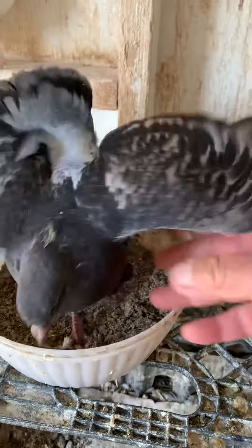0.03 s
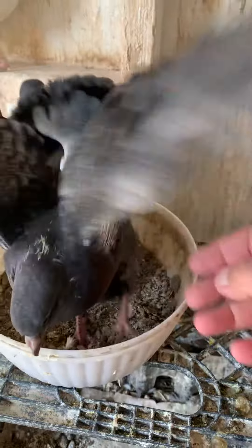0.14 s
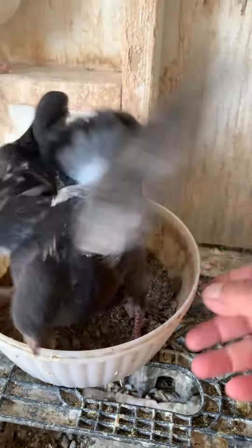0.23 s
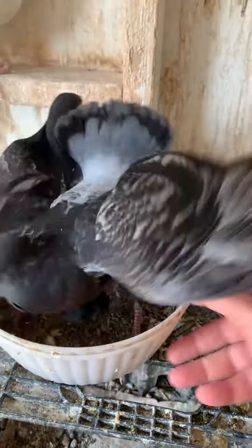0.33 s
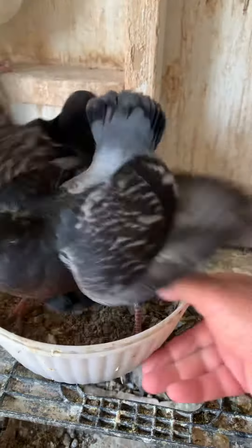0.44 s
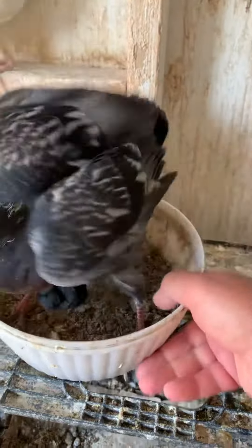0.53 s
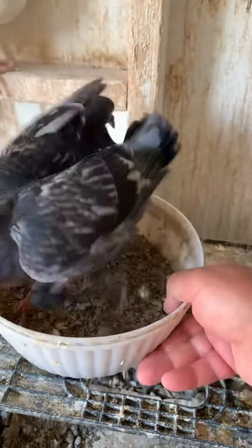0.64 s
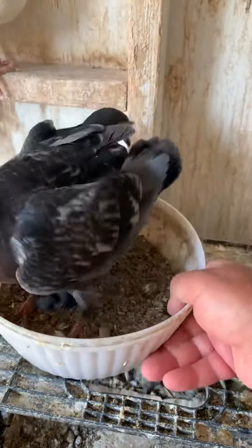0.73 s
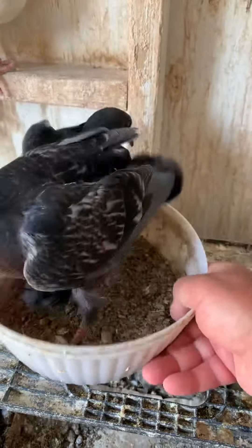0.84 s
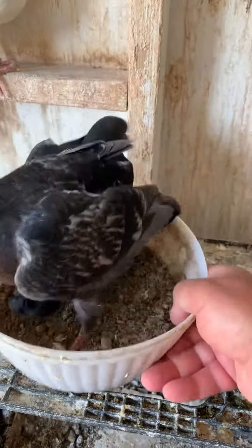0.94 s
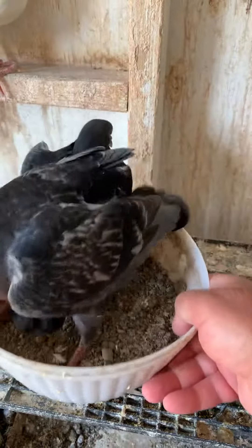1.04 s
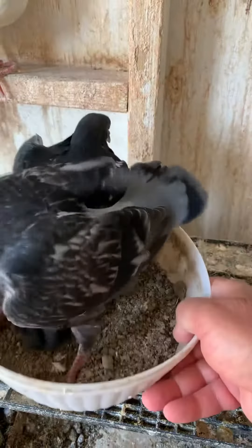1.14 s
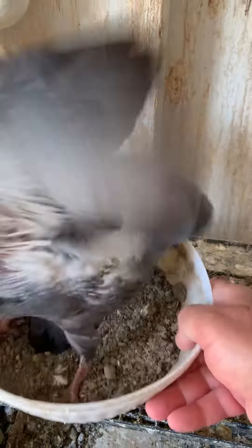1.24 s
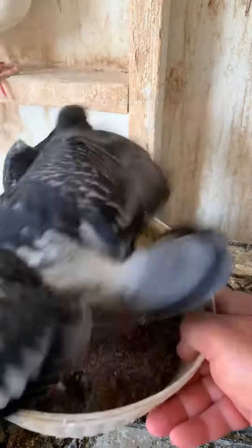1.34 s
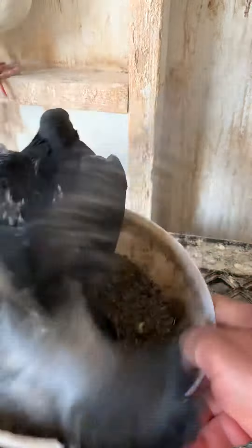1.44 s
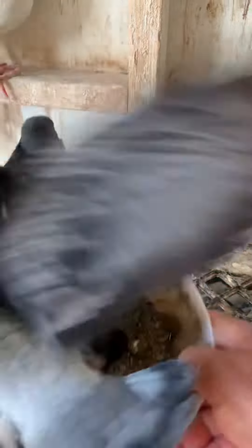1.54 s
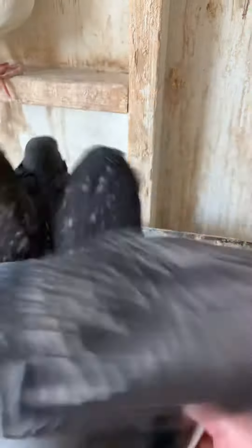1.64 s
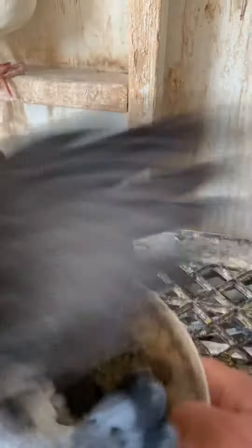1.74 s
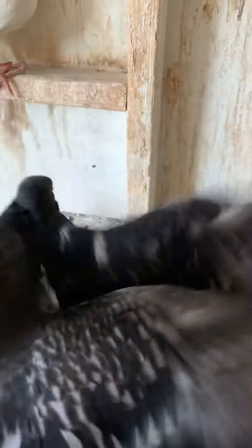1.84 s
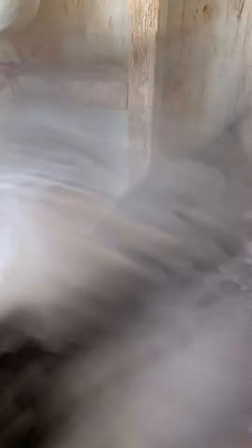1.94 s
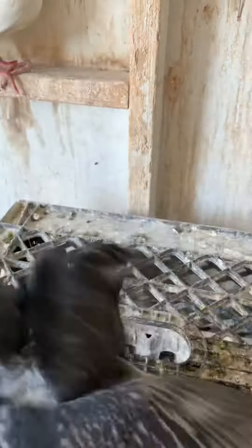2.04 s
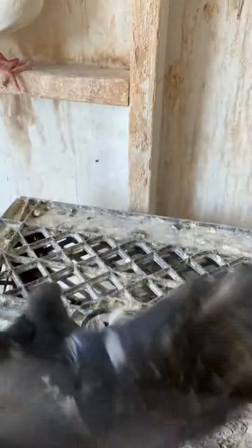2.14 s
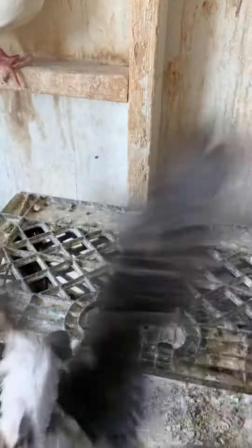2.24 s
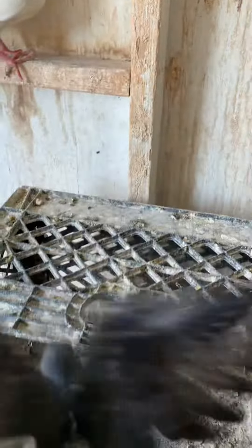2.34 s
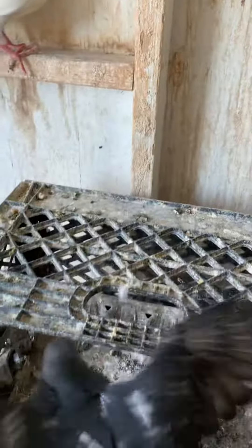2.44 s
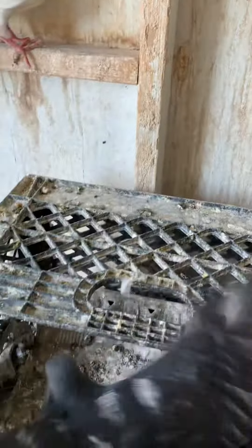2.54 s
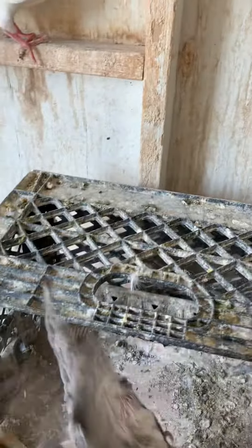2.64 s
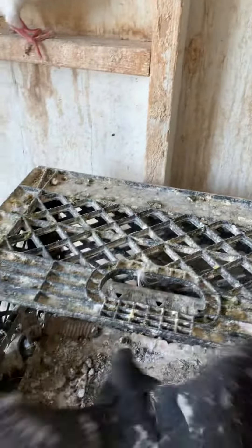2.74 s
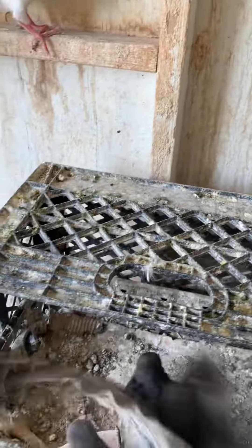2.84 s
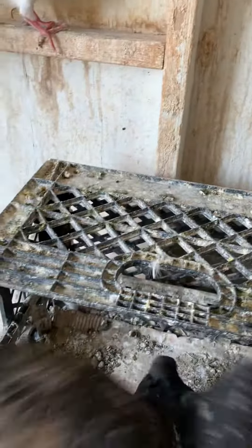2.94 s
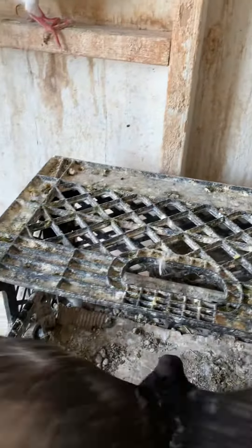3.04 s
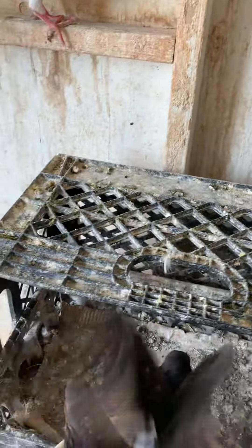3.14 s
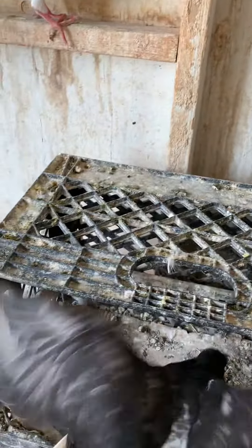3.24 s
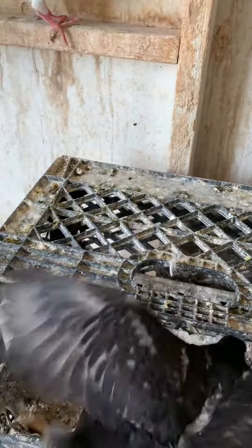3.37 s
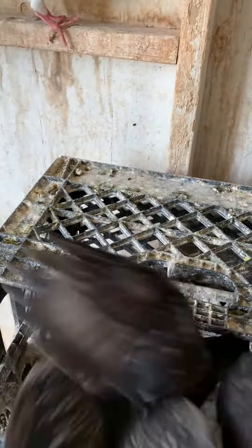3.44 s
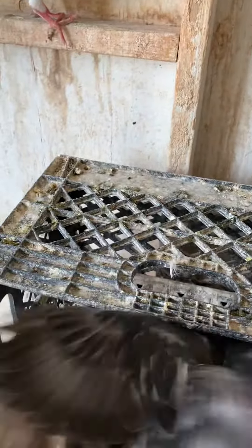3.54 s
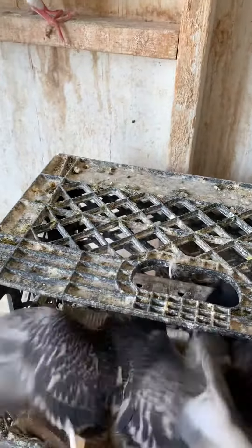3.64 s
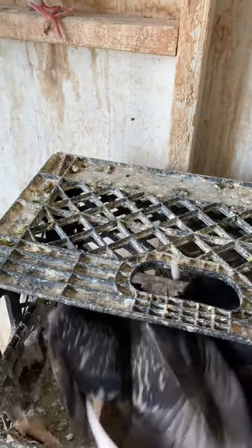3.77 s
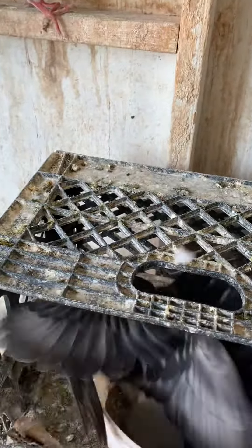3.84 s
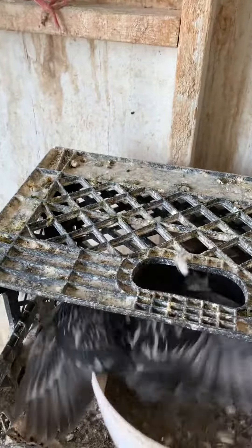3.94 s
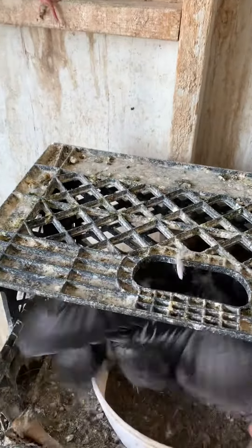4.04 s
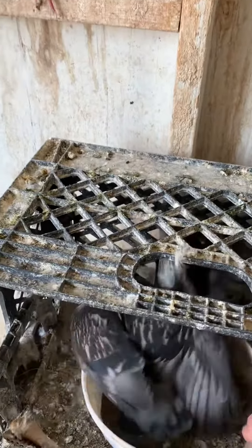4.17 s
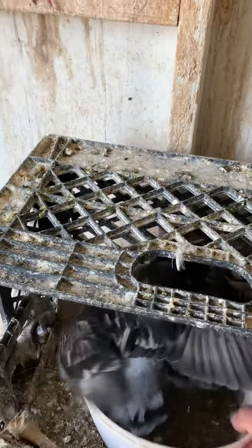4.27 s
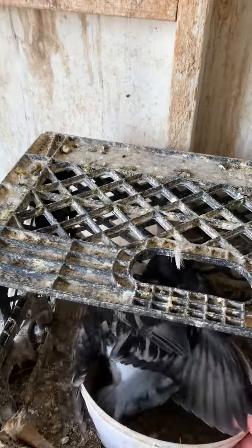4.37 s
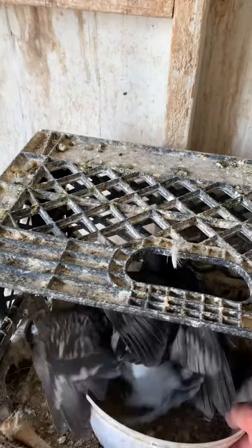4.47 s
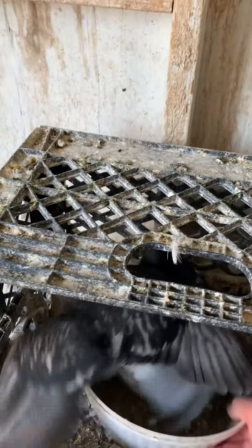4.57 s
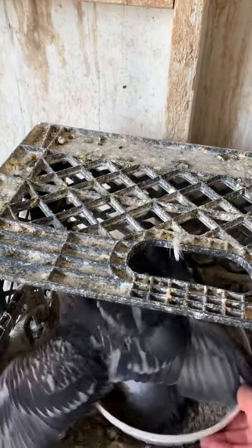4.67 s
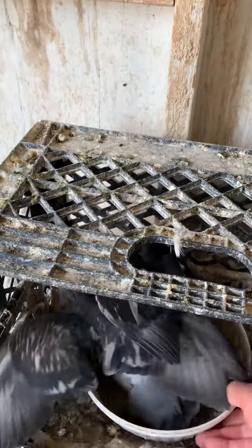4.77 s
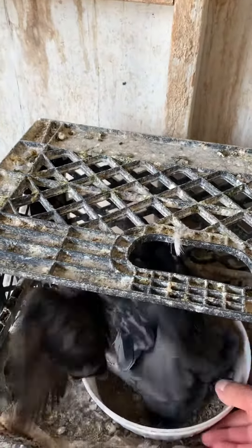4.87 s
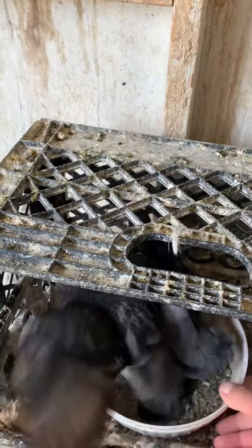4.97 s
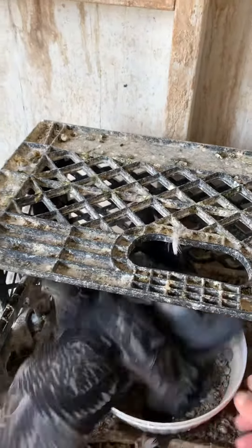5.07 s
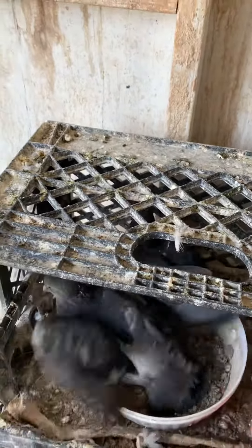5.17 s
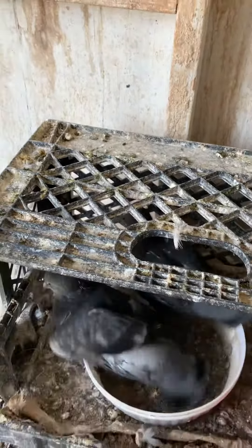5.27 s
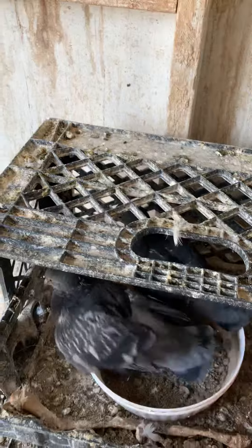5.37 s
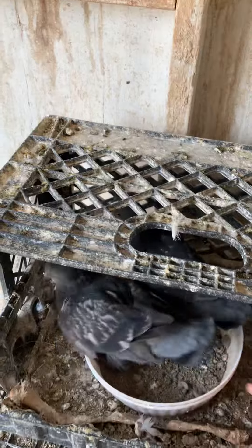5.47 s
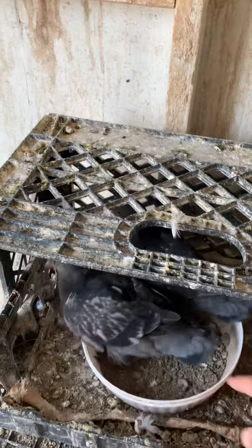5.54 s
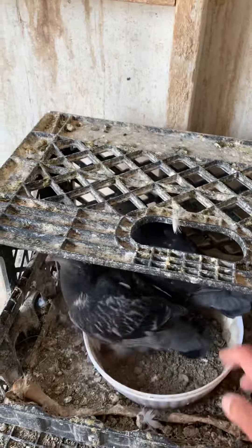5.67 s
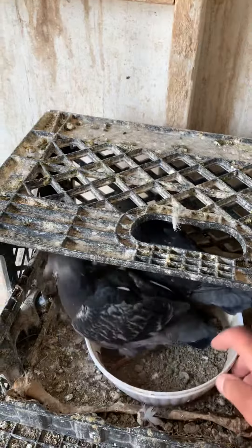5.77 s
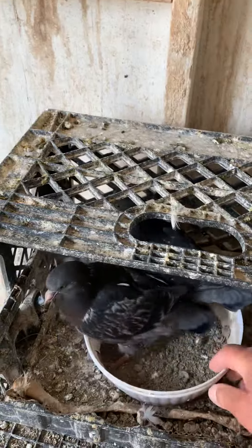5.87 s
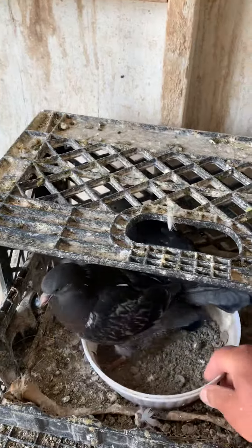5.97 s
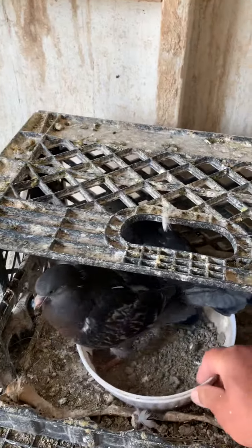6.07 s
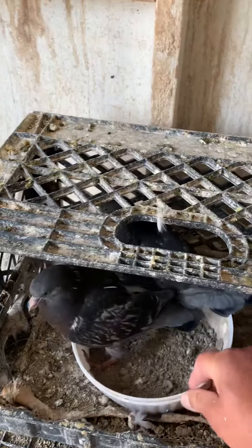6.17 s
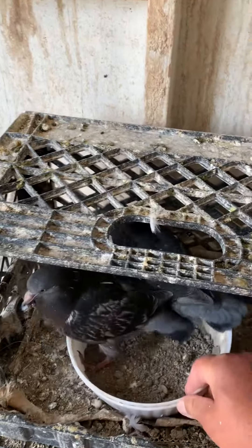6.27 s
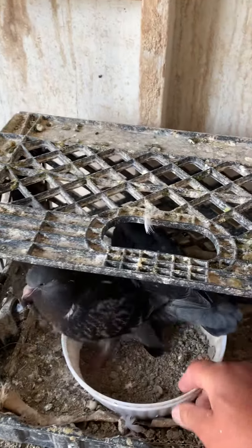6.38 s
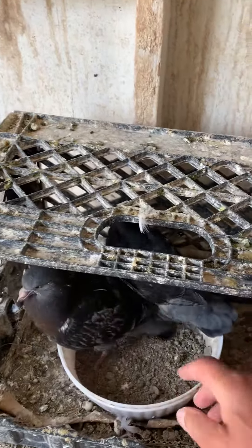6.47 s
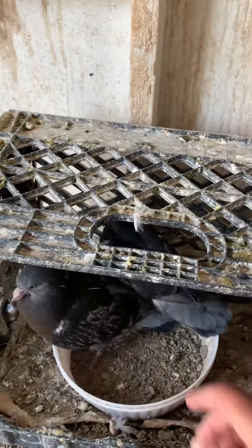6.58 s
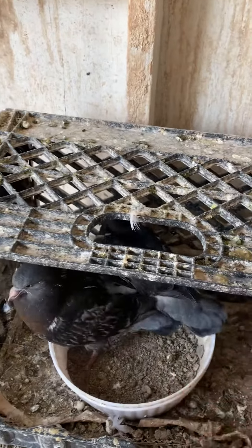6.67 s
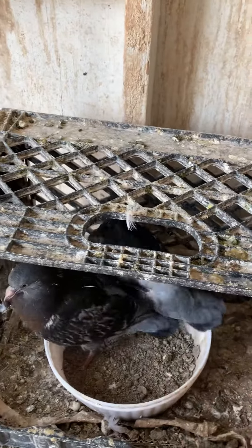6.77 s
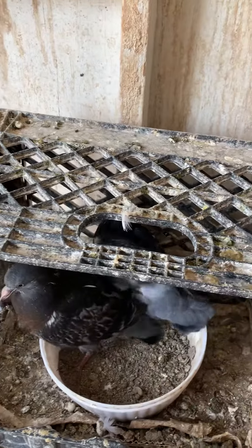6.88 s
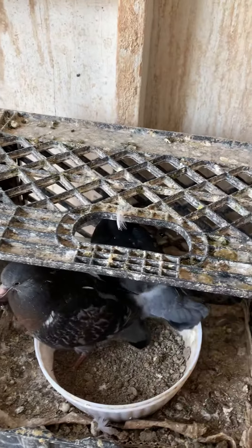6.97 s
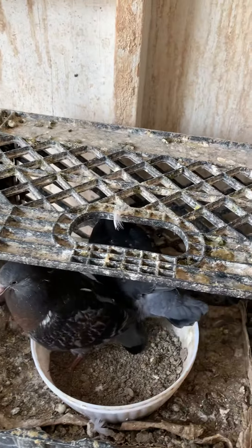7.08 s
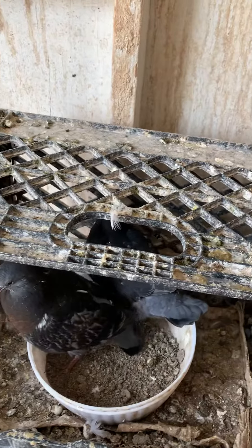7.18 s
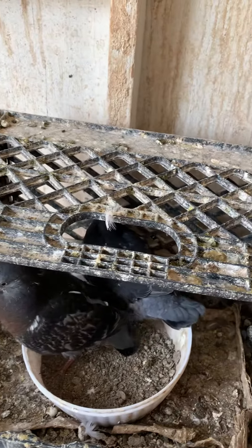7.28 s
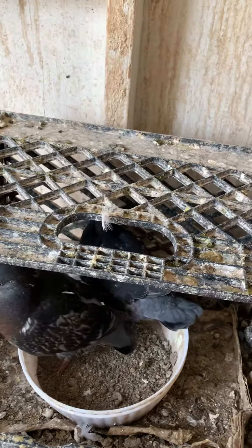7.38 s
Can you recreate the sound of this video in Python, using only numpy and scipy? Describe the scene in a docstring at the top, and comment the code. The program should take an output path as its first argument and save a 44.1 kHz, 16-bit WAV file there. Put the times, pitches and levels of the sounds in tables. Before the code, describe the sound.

Close wing flaps crack and thump against a plastic crate, then settle into gritty scraping, claw ticks and a few high peeps.

```python
"""A small wooden loft: young pigeons scramble out of a plastic tub of grit, right under a hand-held microphone.
Feathers rustle, feet and tub scrape in the grit and claws skid and tick, all from shaped noise and short rings;
wing tips slap as noise bursts, and wings and bodies knock on a plastic crate as sinking tones and resonances.
A squab peeps in gliding sines, each close stroke pushes air at the microphone, and a low rumble lies beneath."""
import sys
import numpy as np
from scipy import signal
from scipy.fft import rfft, irfft, next_fast_len
from scipy.io import wavfile
from scipy.ndimage import map_coordinates

SR = 44100
rng = np.random.default_rng(int(sys.argv[2]) if len(sys.argv) > 2 else 0)


def unload_wav(signal):
    """Save mono or channel-first audio to the path in sys.argv[1] as 16-bit WAV at rate SR, clipped to [-1, 1]."""
    wavfile.write(
        sys.argv[1],
        SR,
        np.round(np.clip(np.atleast_2d(signal).T, -1, 1) * 32767).astype(np.int16),
    )


N = 326781
TIME = np.arange(N) / SR
PADDED = next_fast_len(N)
HZ = np.fft.rfftfreq(PADDED, 1 / SR)


def amp(db):
    """Decibels to gain."""
    return 10 ** (np.asarray(db) / 20)


def unit(x):
    """Scales to rms 1."""
    return x / np.sqrt(np.mean(x ** 2) + 1e-20)


def read(points, hz):
    """Reads (frequency [Hz], value) rows on a log-frequency axis."""
    f, value = np.transpose(points)
    return np.interp(np.log(hz + 1), np.log(f + 1), value)


def level(rows, axis):
    """One dB column of a curve over time, as a gain for every sample."""
    rows = np.array(rows)
    return amp(np.interp(TIME, rows[:, 0], rows[:, axis]))


def add(mix, s, sound):
    """Mixes a sound in at time s."""
    part = mix[..., max(round(s * SR), 0):][..., :sound.shape[-1]]
    part += sound[..., :part.shape[-1]]


def colour(x, points):
    """Causal minimum-phase filter of unit energy with the given spectrum."""
    size = 4096
    log_gain = np.log(amp(read(points, abs(np.fft.fftfreq(size, 1 / SR)))))
    minimum_phase = np.exp(np.conj(signal.hilbert(log_gain)))
    taps = np.fft.ifft(minimum_phase).real[:size // 2]
    return signal.oaconvolve(x, taps[None] / np.linalg.norm(taps), axes=1)[:, :N]


def band(hz, octaves):
    """A round hump of spectrum about hz, as (frequency [Hz], level [dB]) rows."""
    away = np.arange(-6, 7) / 2  # octaves from the centre
    return np.transpose([hz * 2 ** away, -20 * np.log10(1 + (away / octaves) ** 2)])


def noise():
    """Two white noises: what both microphone ports share, and what sets them apart."""
    return rng.standard_normal((2, N))


def wander(rate_hz):
    """Smooth chance of rms 1 with about the given speed."""
    lowpass = 1 / (1 + (HZ / rate_hz) ** 4)
    return unit(irfft(rfft(rng.standard_normal(PADDED)) * lowpass, PADDED)[:N])


def grainy(rate_hz, spread_db):
    """Noise that comes in clumps, as barbs and grains catch and let go."""
    return unit(noise() * amp(spread_db * np.clip(wander(rate_hz), -2.2, 2.2)))


def bursts(times, dbs, decay_ms, rise_ms):
    """Envelope of blows: each swells exponentially up to its moment and dies away."""
    out, ms = np.zeros(N), np.arange(-SR // 12, SR // 5) * 1e3 / SR
    for s, db, fall in zip(times, dbs, decay_ms * np.ones(len(times))):
        shape = np.exp(np.minimum(ms / abs(rise_ms), -ms / abs(fall)))
        add(out, s + ms[0] / 1e3, amp(db) * shape)
    return out


def riffle(per_s, decay_ms):
    """Envelope of feathers or grains flicking past in turn: uneven sharp onsets that die quickly."""
    count = int(2 * per_s * N / SR)
    gaps, sizes = rng.uniform(.3, 1.7, (2, count))
    starts = np.cumsum(gaps) / per_s - 2 / per_s
    last = np.searchsorted(starts, TIME) - 1
    age_ms = (TIME - starts[last]) * 1e3
    return unit(sizes[last] * np.exp(-age_ms / decay_ms) + .15)


def ripple(hz, decay_ms, per_s, lead_db, octaves):
    """One firm contact and a dying run of uneven little ones, all sounding about hz."""
    t = np.arange(SR // 8) / SR
    hits = (rng.random(len(t)) < per_s / SR) * rng.standard_normal((2, len(t)))
    hits[0, 0] = amp(lead_db)
    dying = hits * np.sqrt(SR / per_s) * np.exp(-t * 1e3 / decay_ms)
    return colour(dying, band(hz, octaves) * [1, 2])  # doubled dB: a steeper hump


RUMBLE_DB = -43
# low rumble of the place: (frequency [Hz], relative level [dB])
RUMBLE_SPECTRUM = [(12, -20), (20, -31.5), (37, 4), (75, 0.5), (94, 3), (108, -25), (182, -15),
                   (268, -26.5), (300, -26), (390, -59), (660, -120)]
# faint air noise: (frequency [Hz], relative level [dB])
AIR_SPECTRUM = [(60, 9.5), (150, 12), (400, 4), (850, 15.5), (2000, 11), (5000, -56), (9000, -23),
                (15000, -58)]


def background(air_db=-56):
    """A low wavering rumble and faint air noise."""
    rumble = unit(colour(grainy(rate_hz=3, spread_db=1.5), RUMBLE_SPECTRUM))
    return amp(RUMBLE_DB) * rumble + amp(air_db) * colour(noise(), AIR_SPECTRUM)


# restlessness of the wings close by: (time [s], relative rustle level [dB])
RUSTLE_LEVELS = [(0.0, -56), (0.62, -57.5), (1.19, -66), (1.42, -71), (1.71, -57), (1.98, -43.5),
                 (2.41, -49.5), (2.5, -58.5), (3.42, -53.5), (3.8, -46), (4.66, -49.5), (4.75, -49.5),
                 (5.76, -63), (6.83, -64), (7.02, -61), (7.41, -69)]
# vanes brushing over each other: (frequency [Hz], relative level [dB])
BRUSH_SPECTRUM = [(300, -48), (1500, 5), (3500, 7), (6500, 10.5), (9000, 6.5), (12500, 9), (16000, 0)]
# quills flicking past each other: (frequency [Hz], relative level [dB])
CRACKLE_SPECTRUM = [(300, -28), (900, 9.5), (2200, 13), (4000, -21), (8000, 9), (15000, -6)]


def feathers(brush_db=2, flutter_db=2.5, stir_db=-35, lift_ms=12, settle_ms=40,
             crackle_db=-5, crackles_per_s=70):
    """Vanes brush in a fluttering rustle that swells around every slap; now and then quills flick."""
    s, quill, *_ = np.transpose(SLAPS)
    rustle = noise() * amp(flutter_db * wander(rate_hz=44))
    stirred = bursts(s, quill + stir_db, settle_ms, lift_ms)
    restless = level(RUSTLE_LEVELS, axis=1)
    brushing = np.hypot(restless * amp(brush_db), stirred)
    sparse = noise() * (rng.random(N) < crackles_per_s / SR)
    flicks = unit(sparse) * restless * amp(crackle_db)
    return colour(rustle * brushing, BRUSH_SPECTRUM) + colour(flicks, CRACKLE_SPECTRUM)


# scuffle in the tub: (time [s], relative level of scraping grit [dB], of hollow bumping [dB])
SCUFFLE_LEVELS = [(0.0, -49, -61), (0.66, -53.5, -55), (1.26, -55, -60.5), (2.04, -59, -43.5),
                  (2.37, -105, -49), (2.81, -56, -60), (2.99, -45, -53), (3.32, -52.5, -49),
                  (3.94, -47, -39.5), (4.15, -38, -43), (4.34, -39, -55), (4.41, -50, -54.5),
                  (4.57, -38, -48.5), (4.79, -46.5, -55.5), (5.1, -50, -60), (5.7, -47.5, -57),
                  (5.98, -52, -53), (6.81, -52.5, -63), (7.06, -43.5, -51.5), (7.41, -51, -61)]
# grit on plastic: (frequency [Hz], relative level [dB])
GRIT_SPECTRUM = [(200, -14), (500, 12.5), (850, 7), (1400, -6.5), (2200, 0.5), (3500, 5.5), (6000, -1.5),
                 (15000, -44)]
# hollow plastic: (frequency [Hz], relative level [dB])
HOLLOW_SPECTRUM = [(40, -3), (120, -1.5), (205, 3.5), (330, -1.5), (450, -5), (650, -1.5), (1000, -13.5),
                   (3000, -32.5)]


def scuffle(grit_db=-3.0, hollow_db=3, tread_db=3, jolt_db=-14, settle_ms=45):
    """Feet and tub grind over grit, jolted by each knock; the same uneven treading bumps the plastic."""
    s, *_, ringing = np.transpose(KNOCKS)
    tread = amp(tread_db * wander(rate_hz=24.0))
    jolted = bursts(s, ringing + jolt_db, settle_ms, rise_ms=9.4)
    grinding = np.hypot(level(SCUFFLE_LEVELS, axis=1) * amp(grit_db), jolted)
    grit = grainy(rate_hz=1100, spread_db=-2.5) * tread * grinding
    bumps = noise() * tread * level(SCUFFLE_LEVELS, axis=2) * amp(hollow_db)
    catching = riffle(per_s=75, decay_ms=9)
    return colour(grit * catching, GRIT_SPECTRUM) + colour(bumps, HOLLOW_SPECTRUM)


def crumbs(crumb_db=-9.0, kick_db=-8, kick_ms=6, per_s=170, cycles=6):
    """Loose grains click at various pitches, most of them small; every stroke kicks them about harder."""
    out, t = np.zeros((2, N)), np.arange(SR // 20) / SR
    pitches = np.geomspace(850, 4500, 10)
    for hz in pitches:
        landing = rng.exponential(1, N), rng.random(N) < per_s / len(pitches) / SR
        sizes = amp(5 * np.minimum(landing[0], 3)) * landing[1]
        click = np.sin(2 * np.pi * hz * t) * np.exp(-t * hz / cycles) / np.sqrt(hz)
        place = np.array([[1], [rng.uniform(-1, 1)]])
        out += place * signal.oaconvolve(sizes, click)[:N]
    s, _, scrape, _, ms = np.transpose(STROKES)
    kicked = bursts(s, scrape + kick_db, ms, kick_ms)
    return unit(out) * np.hypot(level(SCUFFLE_LEVELS, axis=1) * amp(crumb_db), kicked)


def fidgets(count=10, over_db=-2, spread_db=3, hz=1500, ms=10):
    """Faint strokes at random moments that follow the rustle and scraping levels; rows as in STROKES."""
    when, size, pitch, length = rng.uniform(-1.2, 1, (count, 4)).T
    at = ((when + 1) / 2 * (N - 1)).astype(int)
    offset_db = over_db + spread_db * size
    hiss = 20 * np.log10(level(RUSTLE_LEVELS, axis=1)[at]) + offset_db
    scrape = 20 * np.log10(level(SCUFFLE_LEVELS, axis=1)[at]) + offset_db
    return np.transpose([TIME[at], hiss, scrape, hz * 2 ** (pitch / 2), ms * 2 ** length])


# the clearest strokes of feathers and feet: (time [s], relative hiss level [dB],
# relative scrape level [dB], centre of the scrape [Hz], relative half length [ms])
STROKES = [(0.105, -49, -46, 2830, 36), (0.166, -45.5, -51, 1850, 12), (0.498, -38.5, -44, 2050, 11),
           (0.537, -56, -36, 1980, 9.4), (0.67, -43, -67, 1810, 22), (0.864, -39, -42.5, 900, 17),
           (0.949, -45.5, -39, 2370, 23.4), (1.272, -43.5, -56, 1790, 37), (1.314, -67, -39.5, 1230, 9.7),
           (1.366, -42.5, -37.5, 1410, 12.4), (1.653, -39.5, -43, 800, 14), (1.8, -36.5, -40, 1440, 21.5),
           (1.86, -31.5, -65, 1980, 3.7), (2.268, -29.5, -36, 2000, 3.4), (2.501, -32.5, -35.5, 980, 11.3),
           (2.541, -35, -21, 2350, 4.2), (3.062, -40.5, -47, 2190, 10), (3.126, -42, -64, 1360, 12),
           (3.534, -39.5, -38, 1680, 16), (3.694, -31, -38, 645, 40), (3.916, -30, -38, 1700, 20),
           (4.113, -30, -37, 1280, 24), (4.219, -35, -35, 915, 8.1), (4.291, -45, -39, 1210, 41),
           (4.457, -50, -34.5, 1590, 5.4), (4.622, -38.5, -44, 1160, 40), (5.225, -45, -42.5, 2800, 11),
           (5.339, -47, -40.5, 1500, 7.7), (5.469, -52, -42.5, 2240, 23), (5.656, -48.5, -46.5, 2300, 32),
           (5.78, -70, -55, 2980, 32), (5.886, -53, -44.5, 2300, 18), (6.071, -70, -44, 1120, 61),
           (6.184, -62, -41, 1260, 25), (6.316, -66, -40.5, 3740, 9.5), (6.884, -50, -36.5, 1290, 24.5),
           (6.965, -68, -39, 2370, 23), (7.28, -53, -45.5, 1590, 14)]


def strokes(hiss_db=0, scrape_db=0, bump_db=-12, octaves=0.95, swell=0.8, bump_db_per_octave=-6):
    """A wing or foot sweeps past in hiss and scrape; the lower the scrape, the more the tub sounds along."""
    s, hiss, scrape, hz, ms = np.vstack([STROKES, fidgets()]).T
    flicks = riffle(per_s=120, decay_ms=4.5)
    barbs, grains = unit(noise() * np.sqrt(flicks)), noise() * flicks
    bump = scrape + bump_db + bump_db_per_octave * np.log2(hz / np.median(hz))
    high, middle, low = np.zeros((3, 2, N))
    t = np.arange(-SR // 7, SR // 7) / SR
    for k in range(len(s)):
        start = s[k] + t[0]
        sweep = 1 / np.cosh(t * 1e3 / (swell * ms[k]))
        rub = amp(scrape[k]) * sweep * grains[:, (np.arange(len(t)) + round(s[k] * SR)) % N]
        add(high, start, amp(hiss[k] + hiss_db) * sweep)
        add(middle, start, amp(scrape_db) * colour(rub, band(hz[k], octaves)))
        add(low, start, amp(bump[k]) * sweep)
    return colour(high * barbs, BRUSH_SPECTRUM) + middle + colour(low * noise(), band(375, 0.27))


# claws catching and skidding in the tub: (time [s], level [dB], centre [Hz], decay time [ms],
# width [octaves])
SCRATCHES = [(0.109, -30, 2070, 6.8, 2), (0.166, -36, 1880, 8.4, 0.67), (0.3966, -33, 1670, 3.8, 0.39),
             (0.83, -35, 453, 6.4, 0.65), (0.853, -45, 1300, 4.8, 1.1), (0.891, -37, 2330, 6, 0.54),
             (0.869, -40.5, 1240, 3.2, 0.49), (0.946, -53, 1720, 3.4, 0.69),
             (0.963, -35.5, 2050, 6.2, 0.36), (3.845, -34.5, 1110, 11, 1.15), (3.912, -31, 795, 12, 1.2),
             (4.007, -33, 750, 10, 1.4), (4.094, -30.5, 1100, 10, 1.9), (4.131, -33, 1930, 6.9, 0.88),
             (4.211, -29, 834, 12, 0.81), (4.268, -35, 1400, 6.6, 1.7), (4.351, -25.5, 1180, 11.5, 1.1),
             (4.505, -40, 1100, 7, 1.5), (4.538, -34, 1100, 6.3, 2.1), (4.585, -41, 900, 5.1, 1.5),
             (4.608, -29, 1170, 14, 1.3), (4.627, -33, 1750, 8, 0.63), (4.641, -34, 1000, 5.3, 1.8),
             (4.662, -37, 1500, 8, 0.83), (4.676, -30, 800, 5.4, 0.86), (4.72, -31.5, 1060, 21, 1.4),
             (5.529, -48, 900, 6, 0.68), (5.893, -35, 980, 11, 0.77), (5.917, -36, 950, 7.1, 1),
             (5.931, -29, 920, 8.7, 1.08), (6.068, -40.5, 1500, 10, 1.9), (6.118, -31.5, 1440, 6.3, 0.67),
             (6.169, -31, 725, 8.2, 0.93), (6.184, -41, 2800, 8, 1.1), (6.301, -36, 3980, 6.4, 0.68),
             (6.318, -27.5, 3570, 12, 0.62), (6.52, -43, 1740, 5, 0.63), (6.563, -32, 826, 9, 1.02),
             (6.869, -31.5, 1360, 16, 1.54), (6.957, -30, 970, 12, 1.3)]


def scratches(scratch_db=0, slips_per_s=550, catch_db=-1):
    """A claw catches on the plastic, then skids in quick, uneven slips."""
    out = np.zeros((2, N))
    for s, db, hz, ms, octaves in SCRATCHES:
        add(out, s, amp(db + scratch_db) * ripple(hz, ms, slips_per_s, catch_db, octaves))
    return out


# claws, beaks and grit ticking on plastic: (time [s], relative level of tap and ring [dB],
# relative level of the bright edge [dB], ring [Hz])
TICKS = [(0.122, -24.5, -48, 786), (0.528, -20.5, -38, 1800), (0.653, -30.5, -47, 2320),
         (0.735, -58, -51, 1870), (0.837, -54.5, -35, 1680), (1.119, -52, -40.5, 918),
         (1.359, -33, -35, 1240), (1.582, -30.5, -39.5, 1050), (2.898, -49, -38, 770),
         (3.59, -44, -28, 1210), (4.346, -28, -32.5, 1150), (5.088, -31, -42, 880),
         (6.18, -24, -37.5, 2390), (6.367, -45, -36.5, 830), (6.53, -37, -40, 805)]


def ticks(tap_db=-11, edge_db=2, ring_db=-4, tap_ms=6, edge_ms=4, ring_ms=3):
    """Small hard contacts: a dull tap, a brief ring and a bright edge."""
    s, tap, edge, _ = np.transpose(TICKS)
    taps = grainy(rate_hz=380, spread_db=2.0) * bursts(s + 0.00075, tap + tap_db, tap_ms, rise_ms=0.19)
    edge_bursts = bursts(s + 0.00167, edge + edge_db, edge_ms, rise_ms=0.19)
    edges = grainy(rate_hz=3500, spread_db=-6.0) * edge_bursts
    out, t = colour(taps, GRIT_SPECTRUM) + colour(edges, CRACK_SPECTRUM), np.arange(SR // 25) / SR
    for s, db, _, hz in TICKS:
        ring = np.sin(2 * np.pi * hz * t) * np.exp(-t * 1e3 / ring_ms)
        add(out[0], s + 0.00085, amp(db + ring_db) * ring)
    return out


# wing slaps close by; some of the hardest land twice, a few ms apart: (time [s],
# relative quill crack level [dB], relative smack level of the vane [dB], relative decay time [ms],
# pitch of the clap [Hz], level of the feathers sliding off [dB])
SLAPS = [(0.2593, -23.5, -28, 11, 2100, -39), (1.4023, -9, -19.5, 2.6, 3700, -31),
         (1.459, -19, -28.5, 14, 750, -31.5), (1.626, -44, -25.5, 1.4, 660, -66),
         (1.778, -13, -34, 10.6, 690, -37), (1.9107, -4, -14, 4.4, 1780, -54),
         (1.9174, -23, -40, 1.3, 3800, -57), (2.065, -11, -26.5, 4.5, 750, -35),
         (2.0937, -19, -24.5, 3.6, 1370, -46), (2.145, -14, -33.5, 10.4, 2100, -39),
         (2.2700, -7.5, -24, 3.2, 1880, -38), (2.2720, -8, -22, 2.8, 1890, -33),
         (2.4220, -6.5, -22.5, 3, 1880, -39), (2.4249, -9, -30, 1.6, 1900, -35),
         (2.5419, -4.5, -15, 3.9, 880, -34), (2.7184, -9.5, -25, 3.1, 2090, -46),
         (2.7218, -5.5, -23, 3.2, 2370, -42), (2.831, -10.5, -57, 1.8, 3000, -42),
         (2.835, -10, -16, 1.1, 2030, -44), (2.9749, -19.5, -33.5, 4.1, 2010, -44),
         (3.286, -27, -42.5, 7.6, 2180, -59), (3.329, -29.5, -26, 19, 1810, -43),
         (3.63, -15.5, -32, 6.4, 1670, -42), (3.669, -15.5, -39, 11, 800, -39),
         (3.9639, 0, -18.5, 5, 2000, -29), (3.9702, -4.5, -19, 5.3, 2600, -24.5),
         (4.130, -15, -42, 4.4, 2400, -48), (4.456, -17, -46, 3, 1700, -49),
         (5.042, -16, -29.5, 2.6, 1200, -41.5)]
# stiff quills: (frequency [Hz], relative level [dB])
CRACK_SPECTRUM = [(300, 3), (1500, -28), (3500, 4.5), (6500, 10.5), (10000, 6.5), (13000, 8), (16000, -10)]
# broad vane: (frequency [Hz], relative level [dB])
SMACK_SPECTRUM = [(100, 7.5), (400, 0.5), (900, -2), (2000, 0), (3500, 0.5), (8000, -9)]


def slaps(crack_db=-9, snap_db=2.5, smack_db=-3, clap_db=-2, swish_ms=22, rush_db=-14, rush_ms=4):
    """Air rushes ahead of the wing, quills strike, the vane claps at its pitch, feathers slide off."""
    s, quill, vane, ms, _, sliding = np.transpose(SLAPS)
    strike = bursts(s + .001, quill + crack_db, ms, rise_ms=.3)
    crack = grainy(rate_hz=1200, spread_db=4) * strike
    crack[0, np.round((s + .001) * SR).astype(int)] += amp(quill + snap_db)  # the leading quill
    slide = bursts(s + .005, sliding, swish_ms, rise_ms=1.2)
    swish = slide * grainy(rate_hz=250, spread_db=5)
    rush = bursts(s, vane + rush_db, 12.0, rush_ms)
    smack = bursts(s + 0.0037, vane + smack_db, 1.62 * ms, rise_ms=0.95) + rush
    crumple = grainy(rate_hz=400, spread_db=4.5)
    out = colour(crack + swish, CRACK_SPECTRUM) + colour(crumple * smack, SMACK_SPECTRUM)
    for at, _, db, fall, hz, _ in SLAPS:
        clap = ripple(hz, fall * 0.42, per_s=650, lead_db=0.0, octaves=0.92)
        add(out, at + 0.00116, amp(db + clap_db) * clap)
    return out


# knocks on crate and tub: (time [s], relative push level [dB], first pitch of the blow [Hz],
# last pitch [Hz], decay time [ms], relative ringing level [dB])
KNOCKS = [(0.261, -41, 945, 284, 6, -47), (1.375, -39, 560, 169, 10, -43), (1.534, -29, 496, 152, 17, -71),
          (1.73, -29, 543, 161, 15, -50), (1.865, -37, 530, 159, 12, -69), (1.9154, -13, 927, 170, 5, -41),
          (1.919, -14, 796, 230, 4, -39), (2.034, -27, 570, 171, 11, -42),
          (2.054, -26, 500, 150, 11, -39.5), (2.2777, -17, 597, 198, 8, -34.5),
          (2.543, -10, 950, 261, 9.6, -23.5), (2.7305, -16, 1460, 472, 4.9, -36.5),
          (2.74, -22, 450, 180.5, 20, -31.5), (3.21, -34.5, 744, 225, 13, -44),
          (3.345, -19.5, 560, 169, 19, -53), (3.384, -25, 890, 383, 12, -35),
          (3.669, -18.5, 1310, 450, 5.2, -40), (3.684, -19, 1180, 420, 7.3, -27),
          (3.709, -20, 716, 217, 9.4, -34), (3.726, -24, 690, 204, 12, -39),
          (3.938, -31, 915, 273, 6, -28.5), (3.973, -24, 850, 260, 10, -49),
          (4.021, -41, 1000, 306, 6, -32.5), (4.076, -31, 705, 384, 9.9, -37),
          (4.124, -25, 600, 217, 13, -42), (4.158, -29, 500, 208, 11, -51), (4.232, -32, 500, 199, 12, -47),
          (4.287, -19, 1100, 212, 13.4, -34), (4.329, -31, 500, 218, 5.9, -41),
          (4.350, -33, 2170, 840, 2, -42), (4.539, -35, 806, 270, 7.4, -37.5),
          (4.614, -27.5, 800, 190, 7.6, -40.5), (4.67, -32, 900, 214, 11, -38),
          (5.043, -13, 1390, 445, 2.6, -37), (5.0456, -20.5, 746, 149, 6, -43)]
# resonances of crate and tub: (nominal frequency [Hz], relative level [dB], t60 [s])
CRATE_MODES = [(170, -7, .12), (210, -4, .13), (250, 5, .2), (401, 1, .18), (480, -6, .09), (600, -6, .1),
               (675, -5, .11), (868, -3, .11), (1290, -11, .08), (1630, -14, .1), (1915, -10, .12),
               (2345, -11, .11)]


def knocks(push_db=3.5, ring_db=-2, rattle_db=4, rattle_ms=16, sag_ms=2.164, rise_share=0.21):
    """A soft blow sinks in pitch as contact spreads; the crate rings and rattles, each hit differently."""
    out, t = np.zeros((2, N)), np.arange(SR // 4) / SR
    for s, db, first_hz, last_hz, ms, ringing in KNOCKS:
        hz = last_hz + (first_hz - last_hz) * np.exp(-t * 1e3 / sag_ms)
        age = t * 1e3 / ms
        push = np.sin(2 * np.pi * np.cumsum(hz) / SR) * (1 - np.exp(-age / rise_share)) * np.exp(-age)
        add(out[0], s, amp(db + push_db) * push)
        phases = rng.uniform(0, 2 * np.pi, (len(CRATE_MODES), 2, 1))
        detunes = rng.uniform(.98, 1.02, len(CRATE_MODES))  # each knock rings at slightly varied pitches
        ring = np.zeros((2, len(t)))
        for (f, d, t60), detune, phase in zip(CRATE_MODES, detunes, phases):
            ring += amp(d - 60 * t / t60) * np.sin(2 * np.pi * f * detune * t + phase)
        add(out, s, amp(ringing + ring_db) * ring * (1 - np.exp(-t / 0.00018)))
    s, *_, ringing = np.transpose(KNOCKS)
    rattle = noise() * bursts(s + 0.00082, ringing + rattle_db, rattle_ms, rise_ms=7.9)
    return out + colour(rattle, HOLLOW_SPECTRUM)


SQUAB_LAG_MS = .175  # the squab sits to the right, so its tone lags in the left port
# squab peeps; two voices may overlap: (relative level of the octave [dB],
# course as rows of (time [s], pitch [Hz], level [dB], hoarseness [0-1]))
PEEPS = [(-25, [(.468, 4300, -54, .2), (.487, 4500, -48, .1), (.515, 4340, -56, .8)]),
         (-20, [(.465, 4080, -52, .3), (.477, 3930, -47, .3), (.494, 4030, -37, 0.1),
         (.51, 4000, -56, .9)]), (-11, [(.57, 4280, -55, .2), (.595, 4320, -49, 0.2), (.627, 4420, -48, .3),
         (.652, 4320, -45, 0.6), (.70, 4150, -47, .8), (.745, 4150, -60, 0.9)]),
         (-18, [(.61, 3420, -48, .3), (.625, 3500, -36, .3), (.643, 3500, -35, .1), (.653, 3510, -41, .4),
         (.665, 3650, -37, .25), (.686, 3680, -37, .3), (.697, 3570, -36, .8), (.735, 3350, -52, 1)]),
         (-20, [(3.73, 3400, -44, .5), (3.762, 3450, -33.5, 0), (3.787, 3370, -54, .6)]),
         (-8, [(5.095, 4150, -50, .1), (5.12, 4090, -48, 0.2), (5.16, 4150, -48, 0), (5.18, 4200, -40, .5),
         (5.215, 4140, -44, 1), (5.245, 4120, -47, 1)]), (-15, [(5.09, 3830, -52, .1),
         (5.125, 3830, -46, .1), (5.145, 3900, -46, .1), (5.17, 3900, -38, .3), (5.186, 4000, -44, 0.54),
         (5.23, 4110, -38, 0.7), (5.253, 4070, -39, 0.3), (5.275, 4130, -28, 0.1),
         (5.305, 4150, -30.5, .05), (5.33, 3960, -41, 0.9), (5.365, 4050, -52, 1)]),
         (-28, [(5.735, 3660, -53, .5), (5.752, 3680, -44, .7), (5.795, 3520, -47, 1)]),
         (-17, [(5.81, 3930, -52, .6), (5.828, 3950, -45, .8), (5.85, 4080, -56, .8)])]


def peeps(peep_db=0):
    """A squab's thin whistle with its octave; where hoarse, the pitch shakes and the tone breaks up."""
    out, lag = np.zeros((2, N)), np.array([[SQUAB_LAG_MS / 1e3], [0]])
    shake, husk = .018 * wander(rate_hz=220), .6 * wander(rate_hz=160)
    for octave_db, course in PEEPS:
        s, *controls = np.transpose(course)
        at = np.flatnonzero((TIME > s[0]) & (TIME < s[-1]))
        hz, db, hoarse = (np.interp(TIME[at], s, c) for c in controls)
        phase = 2 * np.pi * (np.cumsum(hz * (1 + hoarse * shake[at])) / SR - hz * lag)
        whistle = np.sin(phase) + amp(octave_db) * np.sin(2 * phase)
        tone = whistle * signal.windows.tukey(len(at), .1)
        out[:, at] += amp(db + peep_db) * (1 + hoarse * husk[at]) * tone
    return out


# the closest wing strokes puff at the microphone: (time [s], relative level [dB], swing [Hz])
PUFFS = [(1.381, -28.5, 104), (1.426, -22, 84.5), (1.451, -15.5, 55.5), (1.568, -34, 65),
         (1.628, -19.5, 49), (1.74, -15, 85), (1.786, -23, 60), (1.939, -15, 52), (2.059, -12, 93),
         (2.078, -15, 49.7), (2.106, -18, 56.4), (2.232, -19.5, 76), (2.288, -17, 91), (2.509, -19.5, 77),
         (3.349, -24, 80), (3.711, -19, 69), (3.978, -16, 73.4)]
# draught of the wings, strong in the two flurries: (time [s], level [dB])
DRAUGHT_LEVELS = [(1.15, -70), (1.28, -37), (1.37, -29), (2.1, -32), (2.7, -56), (3.25, -43), (3.72, -37.5),
                  (4.33, -33), (4.7, -47), (5.0, -77)]


def puffs(puff_db=-1, cycles=0.71, draught_db=0, draught_hz=62, octaves=0.69, gust_db=2.5):
    """Wings stir the air at the microphone; the closest strokes shove it in one or two slow swings."""
    out, t = np.zeros((2, N)), np.arange(-SR // 20, SR // 20) / SR
    for s, db, hz in PUFFS:
        swing = np.cos(2 * np.pi * (hz * t + rng.random())) * np.exp(-(t * hz / cycles) ** 2)
        add(out[0], s + t[0], amp(db + puff_db) * swing)
    hump, gusts = band(draught_hz, octaves), amp(gust_db * wander(rate_hz=31))
    draught = unit(colour(colour(noise(), hump), hump) * gusts)
    return out + draught * level(DRAUGHT_LEVELS, axis=1) * amp(draught_db)


def glance(x):
    """A near surface returns a first echo whose path changes as birds and microphone move."""
    echo, delay_ms = .3, .9 + .3 * wander(rate_hz=2)
    late = (TIME - delay_ms / 1e3) * SR
    echoed = np.array([map_coordinates(c, [late], order=3) for c in x])
    return (x + echo * echoed) / np.hypot(1, echo)


# decay of the loft: (frequency [Hz], t60 [s])
LOFT_DECAY = [(150, 0.12), (600, 0.11), (3000, 0.12), (8000, 0.076), (15000, 0.083)]
# echoes from the nearest boards: (delay [ms], level against the tail [dB])
ECHOES = [(9.5, -15.5), (13.2, -31), (21.5, -12), (34, -8)]


def loft(x, first_s=0.0075):
    """Close boards throw back a few distinct echoes and a short, dense tail whose treble dies first."""
    size = SR // 2
    sparse = rng.standard_normal((2, size)) * (rng.random((2, size)) < .08)
    taps = sparse * (TIME[:size] > first_s)
    hz, t, z = signal.stft(taps, SR, nperseg=256)
    decay = amp(-60 * t / read(LOFT_DECAY, hz)[:, None])
    tail = signal.istft(z * decay, SR, nperseg=256)[1]
    tail = tail / np.linalg.norm(tail[0])
    dull = np.hanning(9) / np.hanning(9).sum()  # softens each echo
    for ms, db in ECHOES:
        add(tail[0], ms / 1e3, amp(db) * dull)
    return signal.oaconvolve(x[:1], tail, axes=1)[:, :N]


# the microphone pair: (frequency [Hz], phase by which left leads [radians], likeness of ports [0-1])
PORTS = [(60, 0, .87), (300, -.3, .8), (950, -.95, .75), (1900, 0, .35), (2600, -2, .6), (4200, -3.9, .66),
         (5500, -2.3, .65), (6400, -.15, .92), (7500, .1, .92), (9600, 3.1, .98), (11000, 4.7, .75),
         (11900, 6.2, .96), (13000, 6.3, .9), (14200, 9.2, .88)]


def scene(room_db=-12):
    """The birds in the loft, as heard by two closely spaced microphone ports."""
    near = slaps() + ticks() + strokes() + scratches() + feathers() + scuffle() + crumbs()
    birds = glance(near) + knocks()
    everything = birds + amp(room_db) * loft(birds) + puffs() + background()
    shared, apart = rfft(everything, PADDED)
    f, lead, likeness = np.transpose(PORTS)
    turn = np.exp(1j * np.interp(HZ, f, lead) / 2)  # half the lead to each port
    alike = np.interp(HZ, f, likeness)
    shared, apart = shared * np.sqrt((1 + alike) / 2), apart * np.sqrt((1 - alike) / 2)
    left = (shared + apart) * turn * amp(-.5)
    right = (shared - apart) / turn
    return irfft(np.array([left, right]), PADDED)[:, :N] + peeps()


EDGE_HZ = 15900  # upper band limit


def record(dry):
    """The microphone's ceiling flattens the loudest peaks; then a low-pass sets the band limit."""
    limited = np.clip(dry, -.88, .88)
    lowpass = signal.firwin(255, EDGE_HZ, window=("kaiser", 8), fs=SR)
    return signal.oaconvolve(limited, lowpass[None], "same")


dry = scene()
out = record(dry)
unload_wav(out)
```